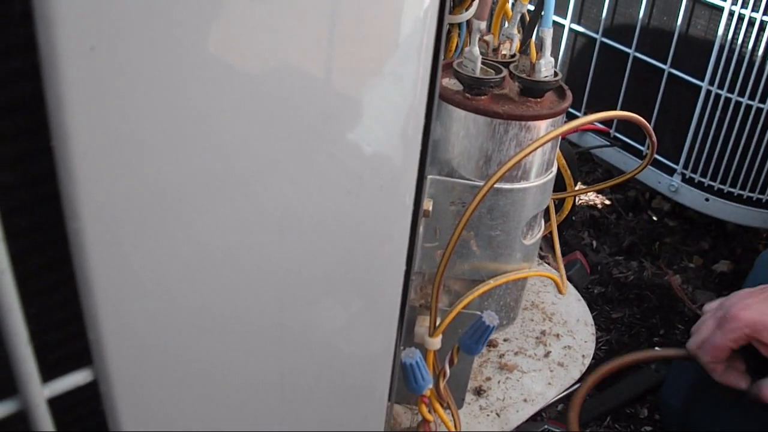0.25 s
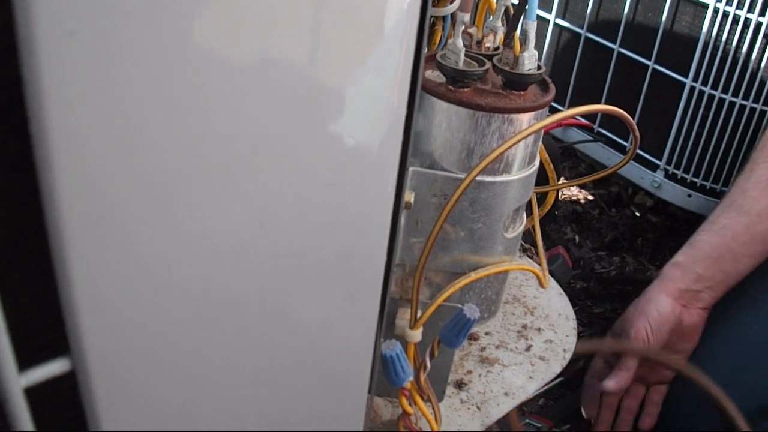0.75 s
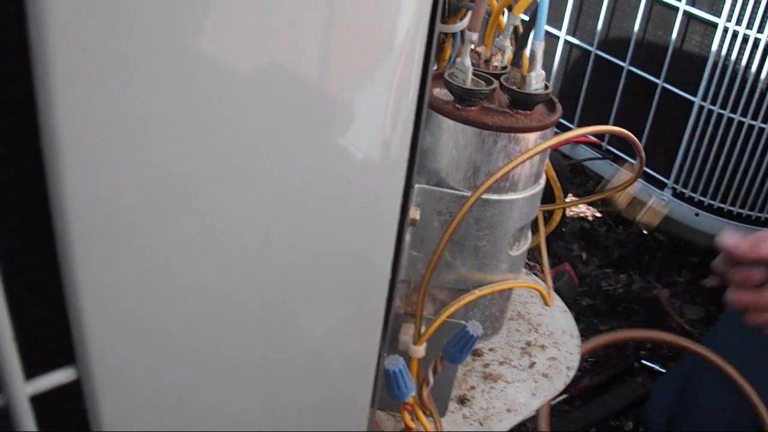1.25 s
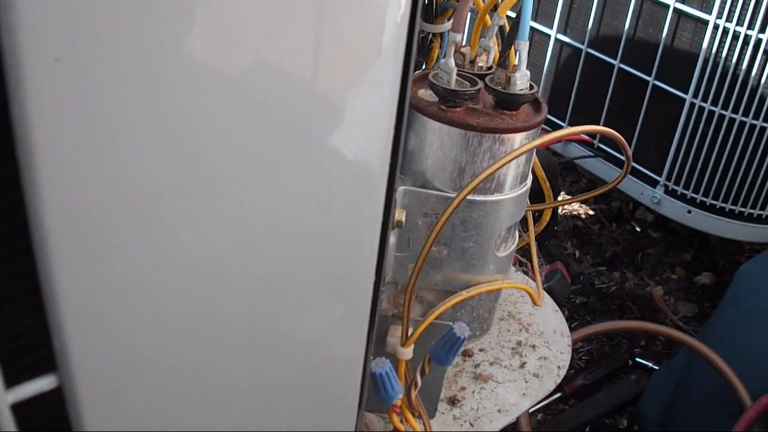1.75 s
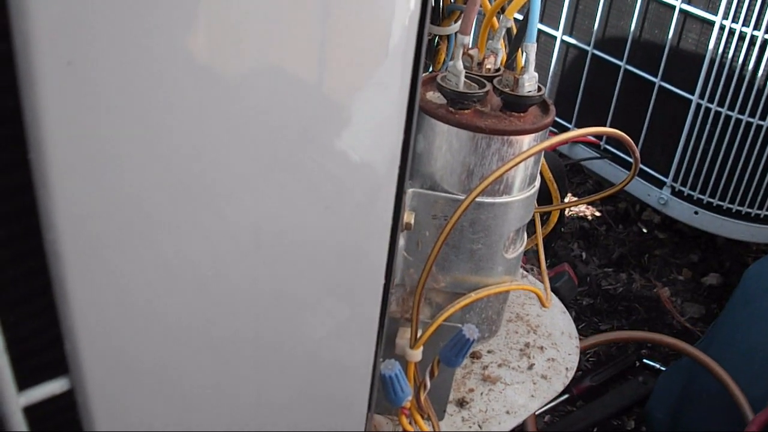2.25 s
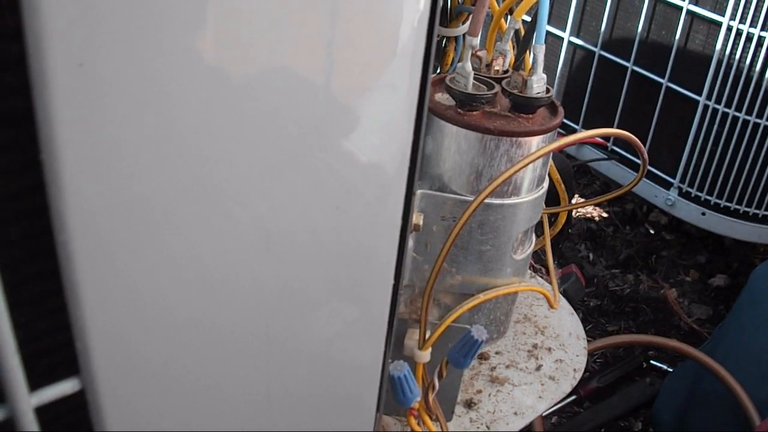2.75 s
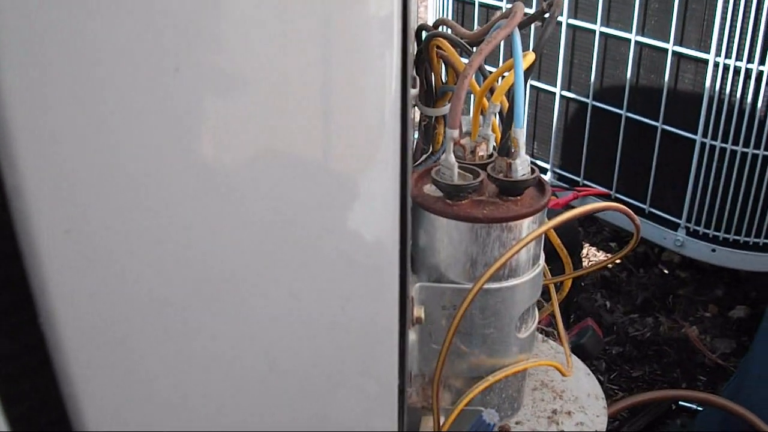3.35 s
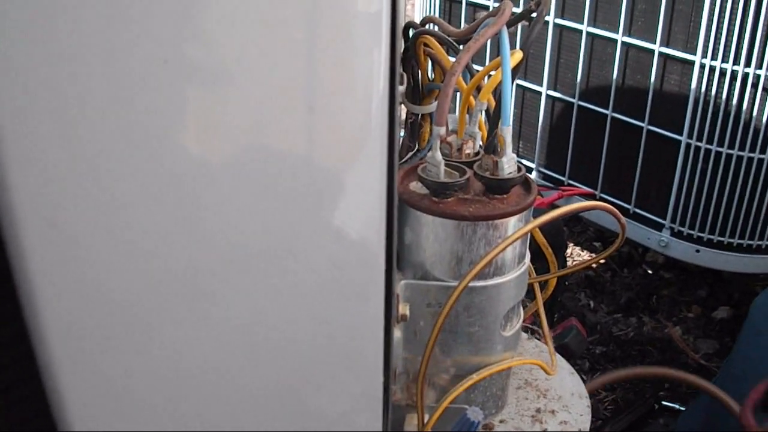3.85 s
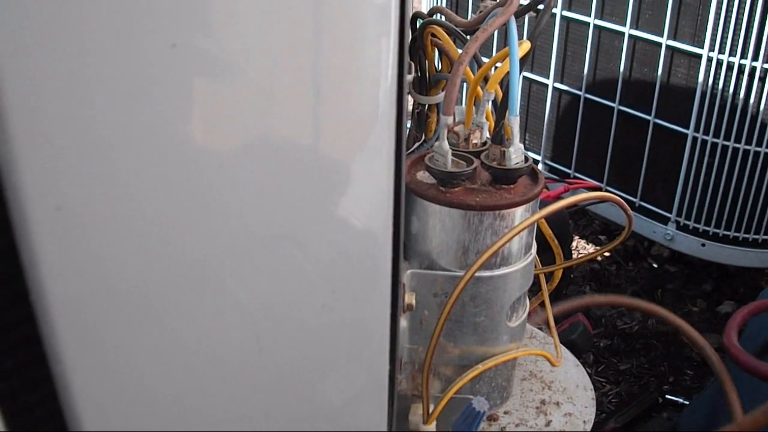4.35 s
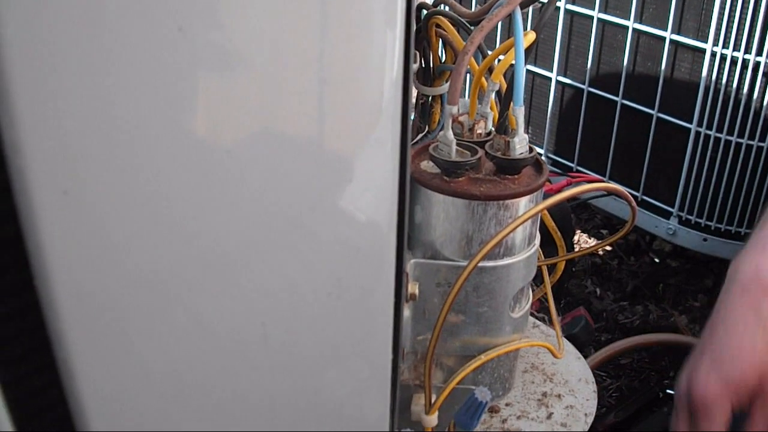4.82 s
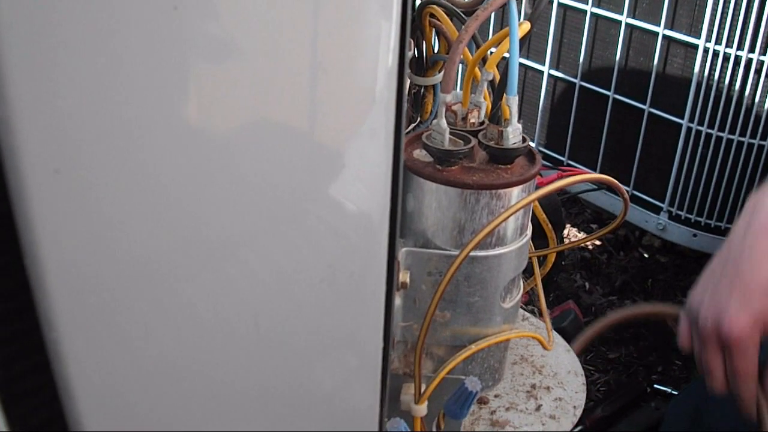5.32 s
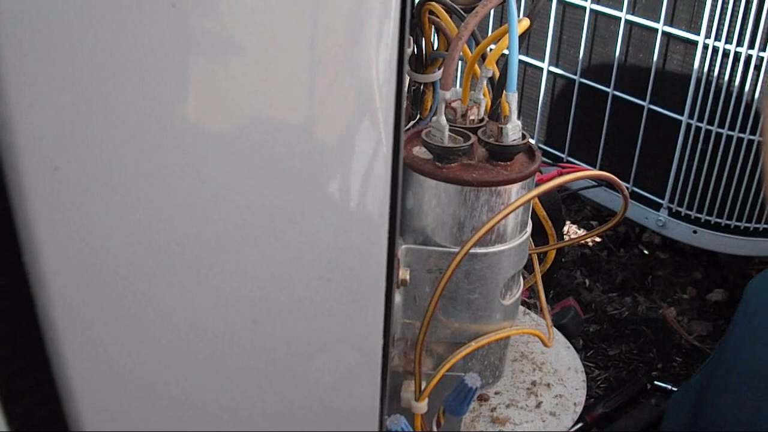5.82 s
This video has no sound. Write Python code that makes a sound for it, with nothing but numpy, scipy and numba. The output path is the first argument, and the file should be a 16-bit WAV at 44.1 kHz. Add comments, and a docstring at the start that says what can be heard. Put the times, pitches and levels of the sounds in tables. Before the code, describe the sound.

From 0 to about 6 seconds an outdoor air-conditioning unit runs steadily, heard very close through its open panel. The fan makes a deep, fast throb, nearly forty pulses a second, over a solid low electrical hum. The compressor adds a constant rough buzz of many close tones, strongest in the low mids, and dull air rushes around it. The microphone's level control is overdriven by the bass, so the sound pumps and ticks rapidly. Low rumbles swell briefly at 0.9, 3.1 and 4.9 seconds. A rubber hose chirps very shortly at 2.3, faintly squeaks and scrapes at 2.8, and squeaks higher at 4.0, with barely audible friction around 4.4. Grainy scrapes cluster at 5.7 to 5.8, then two quick hollow knocks ring the metal casing near 5.87 and 5.9, with a short dull reflection. The machine never changes speed.

```python
"""A fan throbs in an outdoor air-conditioner condensing unit, heard very close with its service panel open.
The blades push pulses of pressure and stir rushing air; the motor iron hums at even multiples of the
mains rate; the compressor buzzes as a comb of shaft tones; now and then the low noise swells.
A rubber gauge hose squeaks by stick-slip, scrapes as grainy noise and knocks the casing into ringing.
Crests trip the recorder's gain control, which drops in steps that tick, then climbs: the sound pumps."""
import sys
import numpy as np
from scipy import signal
from scipy.fft import rfft, irfft
from scipy.io import wavfile
from scipy.ndimage import uniform_filter1d
from numba import njit

SR = 44100
rng = np.random.default_rng(int(sys.argv[2]) if len(sys.argv) > 2 else 0)


def output_pcm(signal):
    """Save a mono or channel-first signal as 16-bit PCM at the path in sys.argv[1].

    Samples are clipped to [-1, 1] before scaling.
    """
    pcm = np.clip(np.atleast_2d(signal).T, -1, 1) * 32767
    wavfile.write(sys.argv[1], SR, np.round(pcm).astype(np.int16))


N = 268128
T = np.arange(N) / SR
FREQS = np.fft.rfftfreq(N, 1 / SR)
TOP_HZ = 15800  # upper band limit


def undb(db):
    """Decibels to amplitude gain."""
    return 10 ** (np.asarray(db) / 20)


def colour(points, hz):
    """Interpolate a (Hz, dB) spectrum on a log-frequency axis."""
    at_hz, db = np.transpose(points)
    return np.interp(np.log(np.maximum(hz, 1)), np.log(at_hz), db)


def noise(db_per_hz):
    """Gaussian noise with the given power density, one value per FREQS bin."""
    white = rfft(rng.standard_normal(N))
    return irfft(white * undb(db_per_hz), N) * np.sqrt(SR / 2)


def rough(points):
    """Noise of rms 1 with a (Hz, dB) colour."""
    y = noise(colour(points, FREQS))
    return y / y.std()


def walk(rate_hz):
    """Smooth random wander, standard deviation 1: noise under a Gaussian lowpass, no DC."""
    lowpass = np.exp(-(FREQS / rate_hz) ** 2) * (FREQS > 0)
    y = irfft(rfft(rng.standard_normal(N)) * lowpass, N)
    return y / y.std()


def swell(start_s, length_s):
    """One half-sine rise and fall."""
    return np.sin(np.pi * np.clip((T - start_s) / length_s, 0, 1))


def decay(age_s, t60_s):
    """Exponential fall of 60 dB in t60_s."""
    return np.exp(-np.log(1000) * age_s / t60_s)


# Low swells. Each row: start in seconds, length in seconds, peak level in dB.
RUMBLES = [(0.906, 0.11, -23.5), (3.106, 0.5, -34), (4.859, 0.271, -24.5)]
# Spectrum of the swells. Each row: frequency in Hz, relative level in dB.
RUMBLE_COLOUR = [(40, -14), (100, -4), (170, -1.5), (300, -17.5), (1000, -39), (15500, -88)]


def rumble():
    """Low-frequency noise that swells and fades now and then."""
    envelope = sum(undb(db) * swell(start_s, length_s) for start_s, length_s, db in RUMBLES)
    return rough(RUMBLE_COLOUR) * envelope


# Air rushing through fan and coil. Each row: frequency in Hz, density in dB per Hz.
AIR = [(15, -44.5), (50, -46.5), (100, -48), (250, -56.5), (330, -63.5), (520, -65), (1100, -66.5),
       (1600, -76), (2600, -72.5), (3400, -87.5), (4500, -91), (8000, -96.5), (11500, -97.5), (15500, -118)]
# Cabinet resonances. Each row: centre in Hz, width in Hz, lift in dB.
CABINET = [(401.7, 41, 7), (678, 227, 11.5), (1411, 110, 6.5), (1933, 440, 5.5), (6420, 1650, 5.5),
           (10200, 2350, 6)]


def air(gust_db=1.88, diffuse_db=-5, diffuse_hz=6500):
    """Turbulent noise coloured by cabinet resonances; left and right differ mostly in the treble."""
    db = colour(AIR, FREQS)
    for hz, width_hz, lift_db in CABINET:
        db = db + lift_db * 2 ** -((2 * (FREQS - hz) / width_hz) ** 2)
    side_db = diffuse_db + 20 * np.log10((FREQS + 1) / np.hypot(FREQS, diffuse_hz))
    mid = noise(db)
    side = noise(db + side_db)
    return (mid + np.outer([1, -1], side)) * undb(gust_db * walk(30))


# Squeaks. Each row: start in seconds, length in seconds, pitch in Hz, level in dB,
# overtones in dB re the fundamental, scratch noise in dB re the squeak level.
SQUEAKS = [(2.2643, 0.011, 1347, -12.5, -7, -8.5), (2.765, 0.01, 1447, -29.5, -20, -10.5),
           (2.793, .014, 1380, -28, -18, -12), (4.04, 0.0068, 2280, -17, -19, -7),
           (4.43, 0.0083, 2020, -32, -18, -7)]
# Squeak overtones. Each row: multiple of the pitch, relative level in dB.
SQUEAK_OVERTONES = [(1.539, 0), (2.5, -14), (2.74, -19)]
# Scrapes. Each row: start in seconds, length in seconds, peak level in dB.
SCRAPES = [(2.794, 0.022, -32), (4.344, 0.079, -42), (5.674, 0.04, -27), (5.708, 0.028, -24),
           (5.761, 0.013, -29), (5.769, 0.019, -28.5)]
# Friction spectrum. Each row: frequency in Hz, relative level in dB.
SCRAPE_COLOUR = [(300, 3.5), (1900, -1.5), (3300, -8), (4200, -13.5), (6200, -13), (10000, -21),
                 (15500, -34)]
# Knocks on the casing. Each row: time in seconds, level in dB.
KNOCKS = [(5.8657, -9), (5.8991, -11)]
# Strong casing modes. Each row: frequency in Hz, level in dB re the knock, t60 in seconds.
CASING = [(288, -4.5, 0.13), (470, -14, .04), (867, -5, 0.033), (1030, -3, 0.011), (1780, -18, 0.015),
          (6700, -27, 0.011)]
# Spectrum of the many weak modes. Each row: frequency in Hz, relative level in dB.
THUD_COLOUR = [(150, -6), (300, 8), (900, -4), (1500, -4), (2600, -11), (4000, -45), (15500, -53)]


def hose(wobble=0.018, grain_db=3.0, thud_db=-6, thud_t60_s=0.065):
    """Rubber sticks and slips in short squeaks, drags in grainy scrapes and knocks on sheet metal."""
    friction = rough(SCRAPE_COLOUR) * undb(grain_db * walk(400))
    out = sum(undb(db) * swell(start_s, length_s) * friction for start_s, length_s, db in SCRAPES)

    for start_s, length_s, hz, db, overtone_db, scratch_db in SQUEAKS:
        angle = 2 * np.pi * np.cumsum(hz * (1 + wobble * walk(305))) / SR
        overtones = sum(undb(part_db) * np.sin(ratio * angle) for ratio, part_db in SQUEAK_OVERTONES)
        tone = np.sqrt(2) * (np.sin(angle) + undb(overtone_db) * overtones)
        out = out + undb(db) * swell(start_s, length_s) * (tone + undb(scratch_db) * friction)

    thud = undb(thud_db) * rough(THUD_COLOUR)
    for start_s, db in KNOCKS:
        age_s = np.maximum(T - start_s, 0)
        ring = sum(undb(mode_db) * decay(age_s, t60_s) * np.sin(2 * np.pi * hz * age_s)
                   for hz, mode_db, t60_s in CASING)
        out = out + undb(db) * (T > start_s) * (ring + thud * decay(age_s, thud_t60_s))
    return out


def reflections(x, wet_db=-11, t60_s=0.067, top_hz=3200, order=2):
    """The casing and the wall beside it return a short dull tail: convolution with decaying noise."""
    tail = rng.standard_normal(N) * decay(T, t60_s)
    lowpass = signal.butter(order, top_hz, fs=SR, output="sos")
    tail = signal.sosfilt(lowpass, tail / np.linalg.norm(tail))
    return x + undb(wet_db) * signal.fftconvolve(x, tail)[:N]


MAINS_HZ = 60
# Motor iron. Each entry: mean level in dB, at 2, 4, 6 times the mains rate.
HUM_DB = [-24, -31, -49]


def motors(waver_db=0.5):
    """The iron is pulled twice in each mains cycle; each harmonic's level wavers."""
    hum = 0
    for k, db in enumerate(HUM_DB, 1):
        cycles = 2 * k * MAINS_HZ * T + rng.random()
        hum = hum + undb(db + waver_db * walk(3.1)) * np.sin(2 * np.pi * cycles)
    return np.sqrt(2) * hum


SHAFT_HZ = 59.265
# Tones that stand well above or below their neighbours. Each entry: multiple of the shaft rate, level in dB.
ODD_TONES_DB = {3: -37, 4: -45, 5: -44.5, 6: -55.5, 7: -47.5, 8: -48.5, 9: -48.5, 10: -34.5, 11: -33.5, 12:
                -39, 13: -47, 18: -68, 21: -46.5, 23: -54.5, 24: -48.5, 25: -49.5, 28: -52, 32: -70, 34:
                -49, 38: -55.5, 40: -51, 41: -73, 42: -47.5, 44: -48.5, 46: -52, 48: -66, 50: -75, 52:
                -56.5, 53: -58, 95: -64.5}
# Mean level of the other tones. Each row: frequency in Hz, level in dB.
BUZZ = [(60, -40), (900, -51.5), (1500, -60.5), (2300, -54.5), (2900, -55.5), (3500, -70.5), (4000, -79.5),
        (5200, -78.5), (6200, -73.5), (7800, -99), (9300, -76.5), (11000, -90), (13000, -82), (15500, -110)]


def compressor(scatter_db=2, slip=0.00027, shimmer=0.33, shimmer_hz=1800, uneven_hz=3000, size=8192):
    """The same clatter repeats on every shaft turn, so it sounds as a long comb of tones."""
    orders = np.arange(1, int(TOP_HZ / SHAFT_HZ))
    hz = orders * SHAFT_HZ
    common_db = colour(BUZZ, hz) + scatter_db * rng.standard_normal(len(hz))
    gain = undb([ODD_TONES_DB.get(k, db) for k, db in zip(orders, common_db)])
    turns = np.cumsum(SHAFT_HZ * (1 + slip * walk(1.26))) / SR

    def comb(gain, phase_rad):
        """One turn of the shaft, built from its harmonics and repeated."""
        spectrum = np.append(0, gain * np.exp(1j * phase_rad))
        turn = irfft(spectrum, size) * size / np.sqrt(2)
        return np.interp(turns, np.arange(size) / size, turn, period=1)

    # the steel shell disperses each knock over the whole turn, the treble unevenly
    spread_rad = np.pi * (3 - np.sqrt(5)) / 2 * orders ** 2
    out = comb(gain, spread_rad + hz / uneven_hz * rng.standard_normal(len(hz)))
    # moving air scatters the short waves most
    scattered = shimmer * gain * hz / np.hypot(hz, shimmer_hz)
    for rate_hz in (1, 6):
        out = out + walk(rate_hz) * comb(scattered, 2 * np.pi * rng.random(len(hz)))
    return out


BLADE_HZ = 37.537
# Fan pressure wave. Each entry: level in dB, at successive multiples of the blade rate from 1.
BLADE_DB = [-11.5, -21.5, -40, -34, -42, -44.5, -41.5, -44.5]


def fan(flutter=0.017, sway_rad=0.029):
    """Each passing blade pushes a rounded sawtooth of pressure; uneven inflow makes it waver."""
    angle = 2 * np.pi * BLADE_HZ * T + sway_rad * walk(7.8)
    wave = sum(-(-1) ** k * undb(db) * np.sin(k * angle) for k, db in enumerate(BLADE_DB, 1))
    return np.sqrt(2) * wave * (1 + flutter * walk(4.6))


def scene():
    """The running unit, with the hose handled beside it."""
    return rumble() + air() + reflections(hose()) + motors() + compressor() + fan()


@njit
def ride(x, trip, late, rest, steps_db, recover_db, least_db, db):
    """Gain in dB per sample: creeps up until a crest trips it, snaps down a step after a lag, rests."""
    out, due, k = np.empty(len(x)), -len(x), 0  # late and rest in samples
    for i in range(len(x)):
        db += recover_db
        if i == due:
            db = max(db - steps_db[k % len(steps_db)], least_db)
            k += 1
        if i > due + rest and abs(x[i]) * 10 ** (db / 20) > trip:
            due = i + 1 + int(late)
        out[i] = db
    return out


TRIP_DB, START_DB, LEAST_GAIN_DB = -3, -1, -2.5
LATE_S, REST_S, RECOVER_DB_PER_S = 0.00018, 0.007, 41
STEP_DB, SMALL_STEP_DB, SMALL_SHARE = 3, 1, 0.3  # share: probability of a small step


def gain_control(x, count=200):
    """Crests of the throb keep tripping the gain: drops cut ticks into the wave and the sound pumps."""
    is_small = rng.random(count) < SMALL_SHARE
    steps_db = np.where(is_small, float(SMALL_STEP_DB), float(STEP_DB))
    db = ride(x.mean(axis=0), float(undb(TRIP_DB)), LATE_S * SR, REST_S * SR, steps_db,
              RECOVER_DB_PER_S / SR, float(LEAST_GAIN_DB), float(START_DB))
    return x * undb(uniform_filter1d(db, size=2))


# Slow drift of the overall level. Each row: time in seconds, gain in dB.
DRIFT = [(0, -0.5), (.35, -1.5), (.65, 0), (1.7, -0.8), (2.6, -0.5), (3.2, -0.4), (4.4, -0.8), (5, 0.45),
         (6.08, -1.4)]


def record(dry, lag_s=0.000021, mono_hz=680):
    """Stepping gain, then two close ports, the left slightly later; bass is mono and the top is cut."""
    held = gain_control(dry) * undb(np.interp(T, *np.transpose(DRIFT)))
    held = held * np.minimum(1, np.minimum(T, T[::-1]) / 0.003)  # 3 ms fades at both ends
    left, right = rfft(held) * np.exp(1j * np.pi * np.outer([-1, 1], FREQS) * lag_s)
    mid = (left + right) / 2
    side = (left - right) / 2 * FREQS ** 2 / (FREQS ** 2 + mono_hz ** 2)
    ports = irfft(mid + np.outer([1, -1], side), N)
    top_cut = signal.ellip(8, 0.2, 70, TOP_HZ, fs=SR, output="sos")
    return signal.sosfilt(top_cut, ports)


dry = scene()
out = record(dry)
output_pcm(out)
```